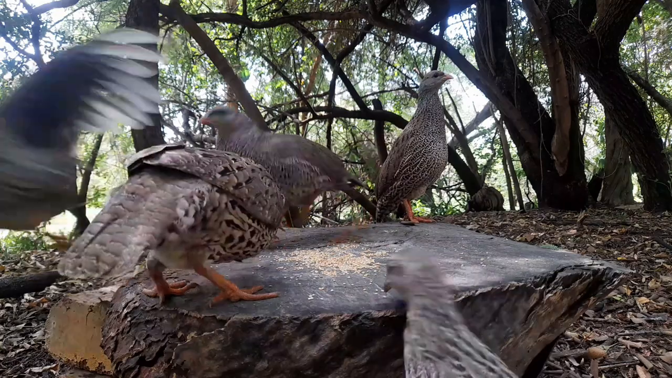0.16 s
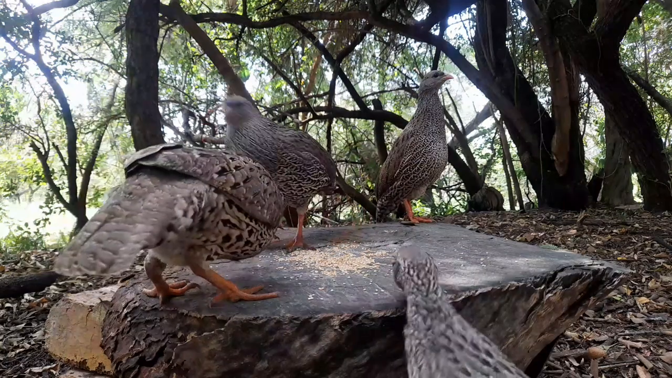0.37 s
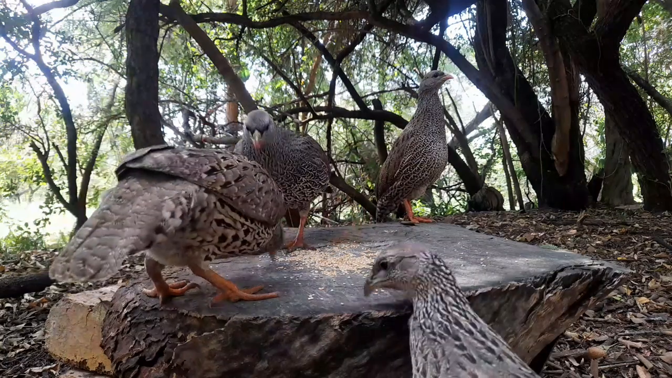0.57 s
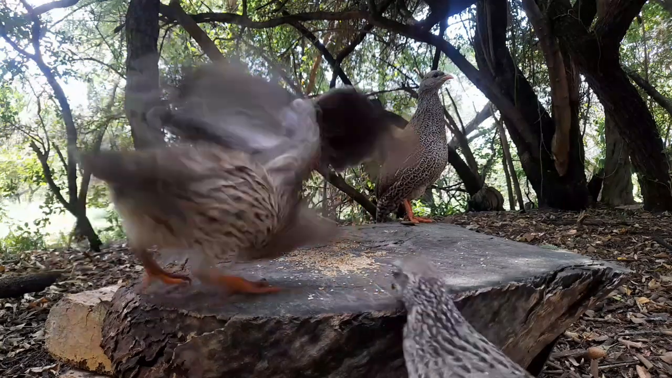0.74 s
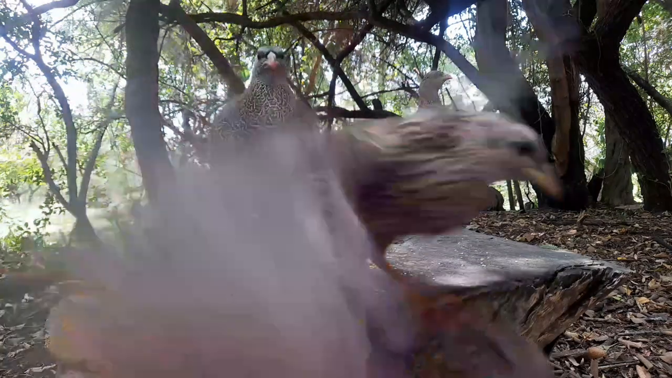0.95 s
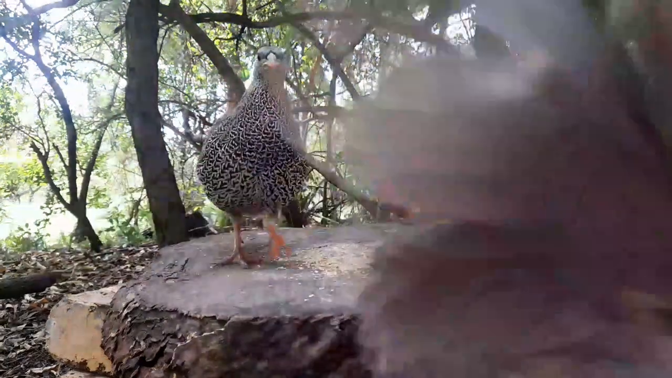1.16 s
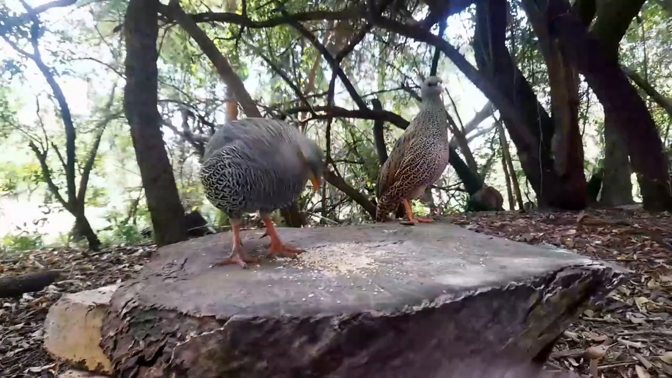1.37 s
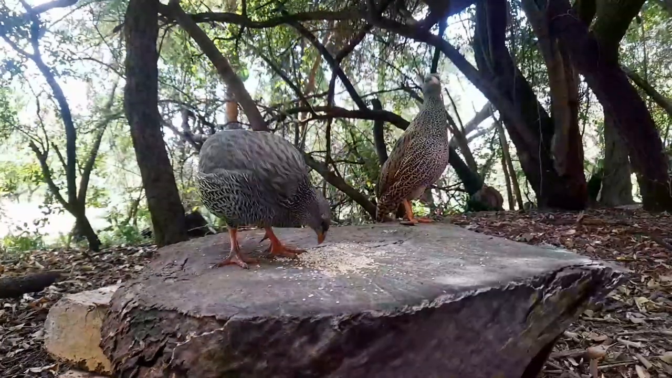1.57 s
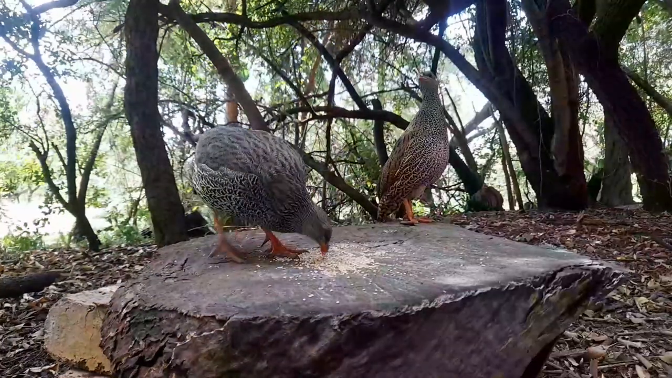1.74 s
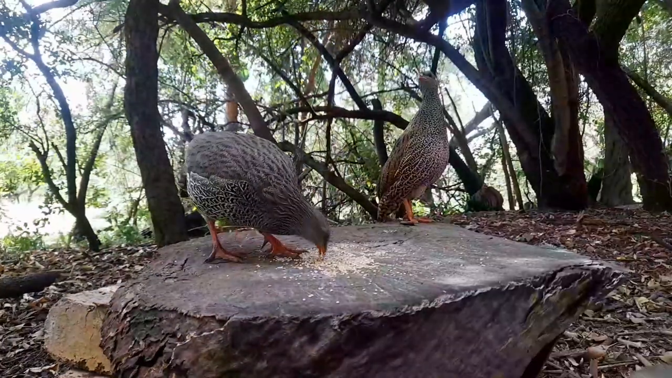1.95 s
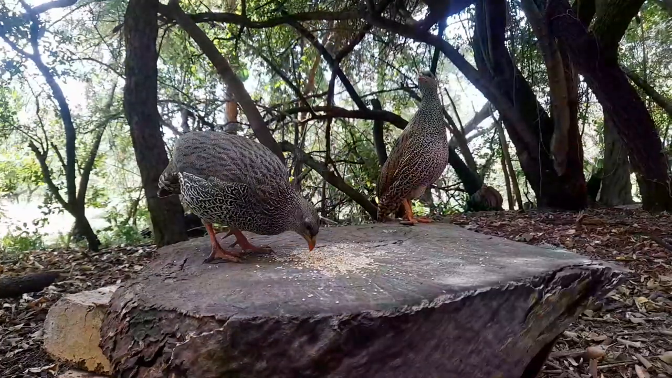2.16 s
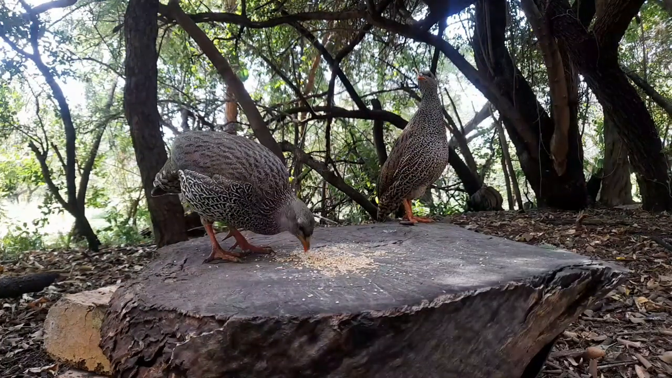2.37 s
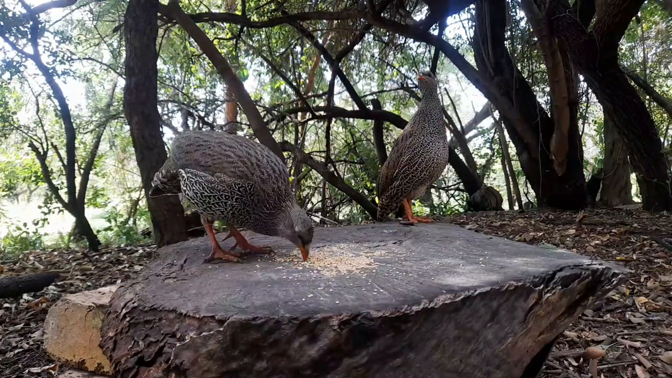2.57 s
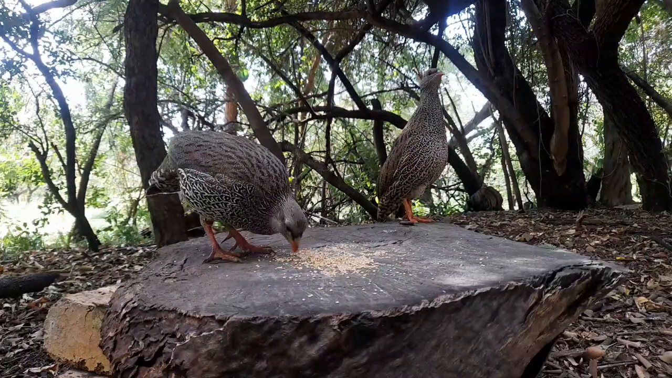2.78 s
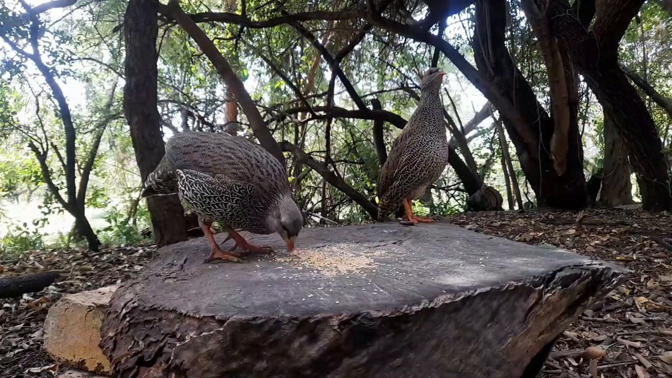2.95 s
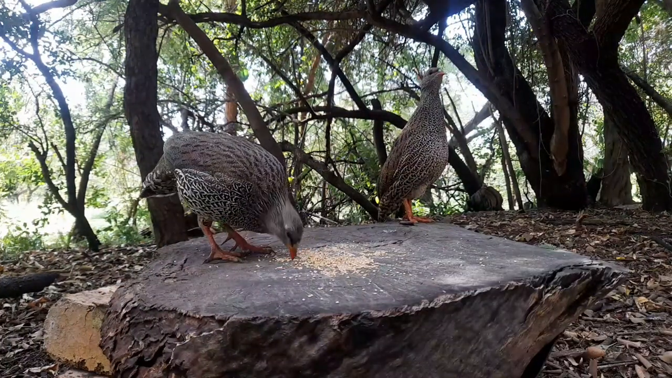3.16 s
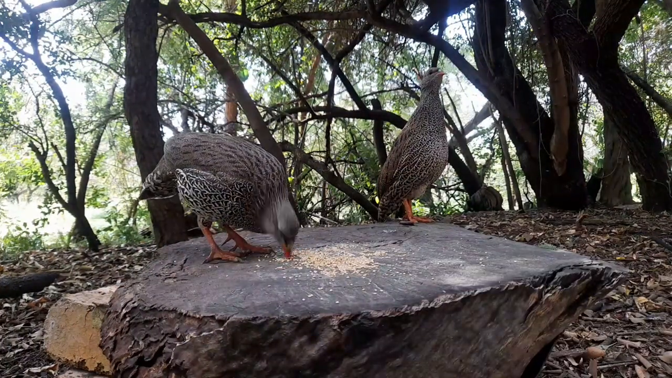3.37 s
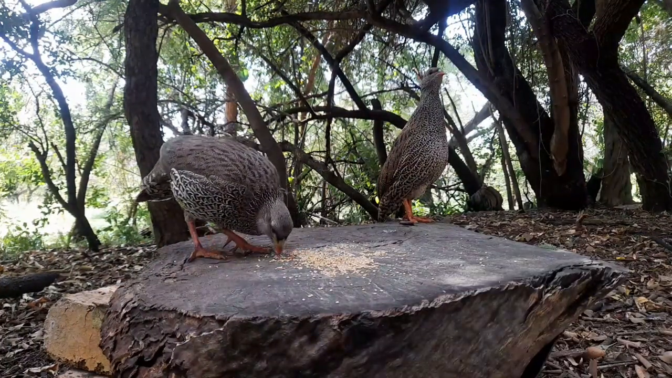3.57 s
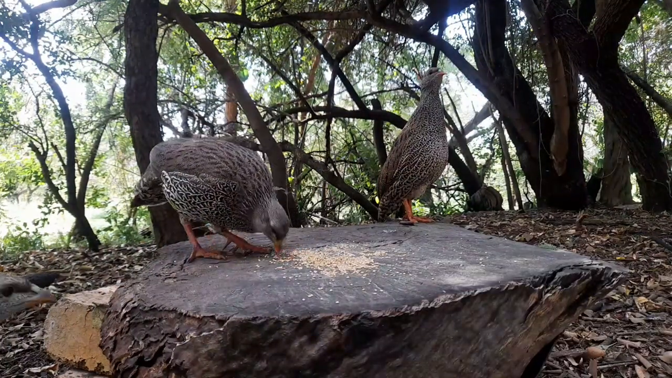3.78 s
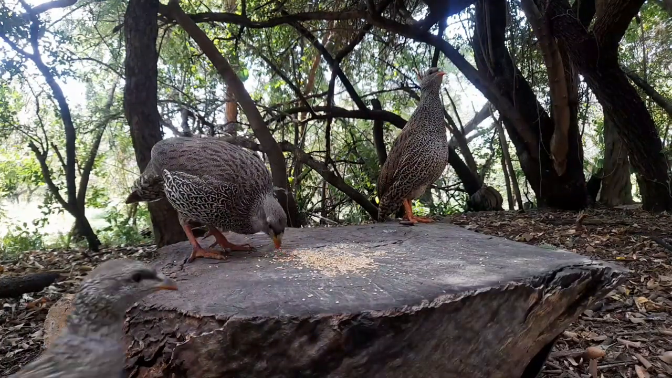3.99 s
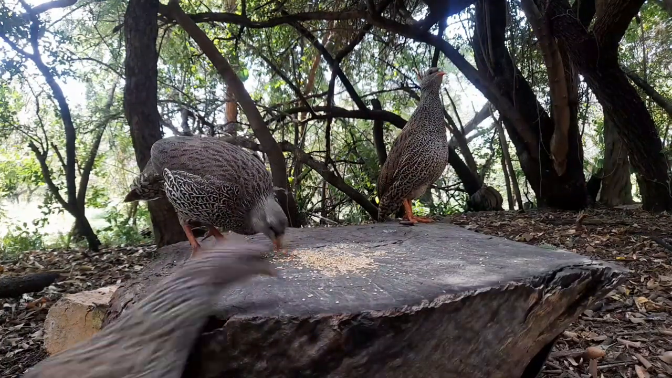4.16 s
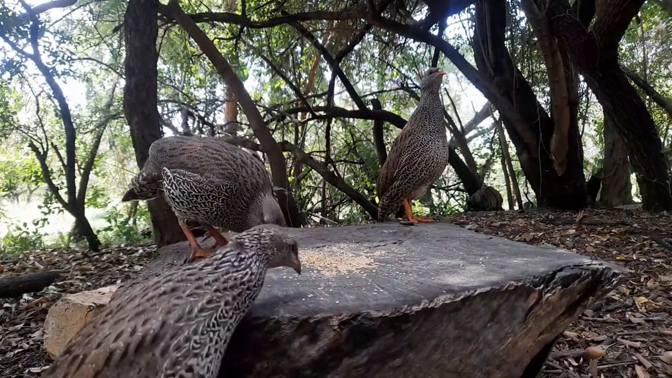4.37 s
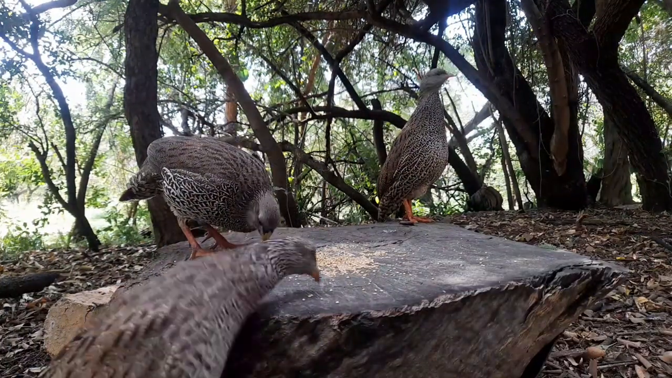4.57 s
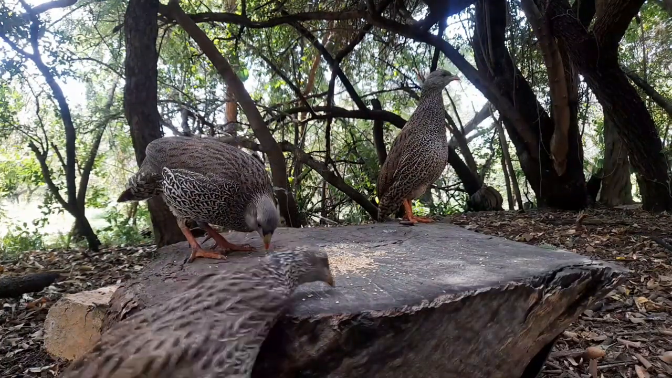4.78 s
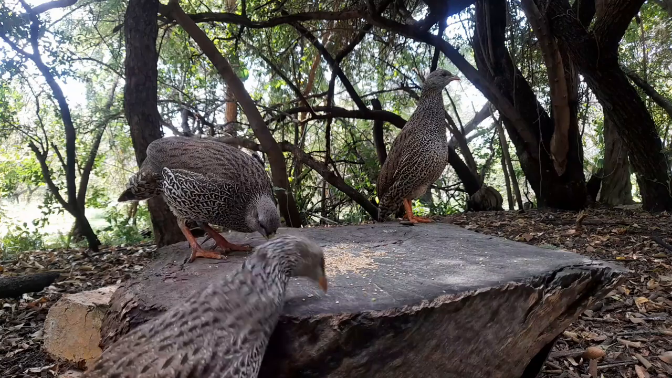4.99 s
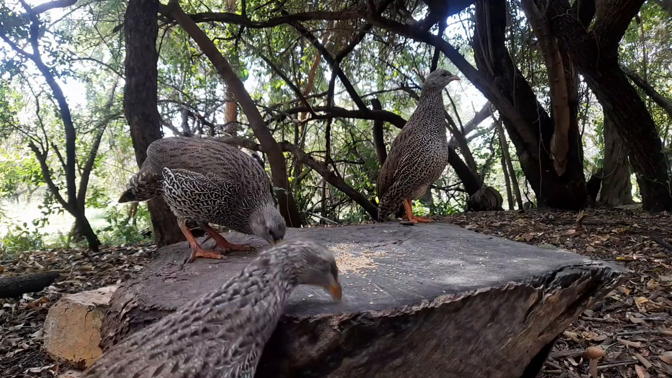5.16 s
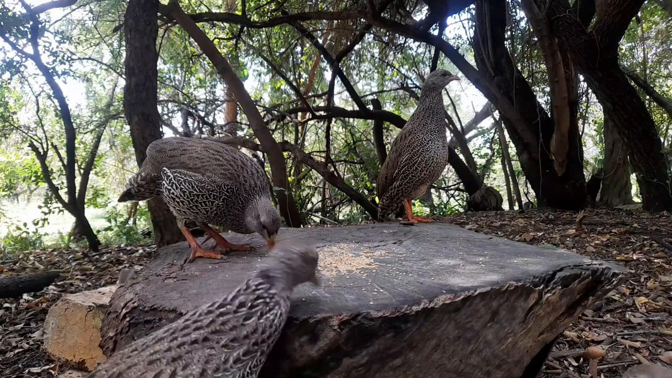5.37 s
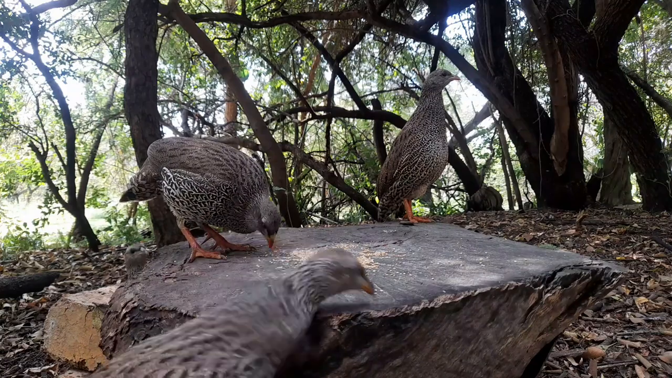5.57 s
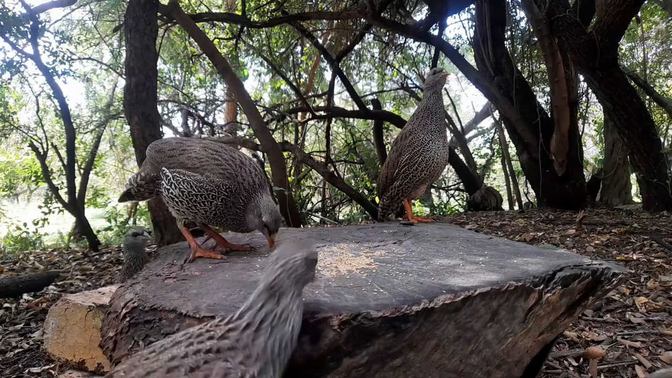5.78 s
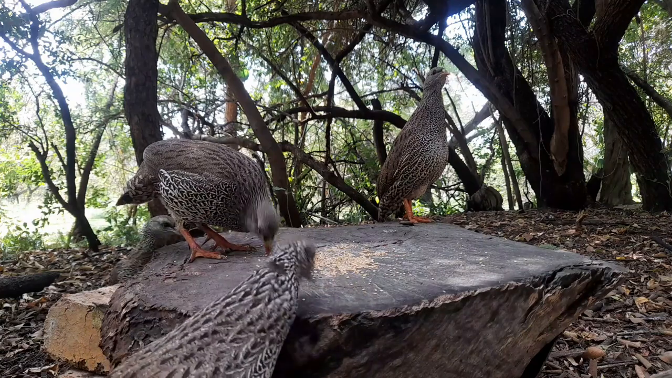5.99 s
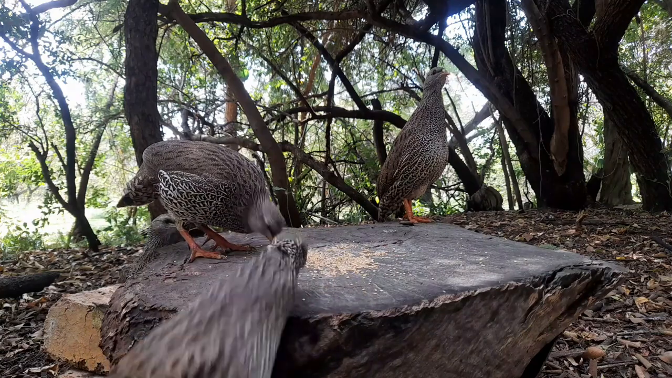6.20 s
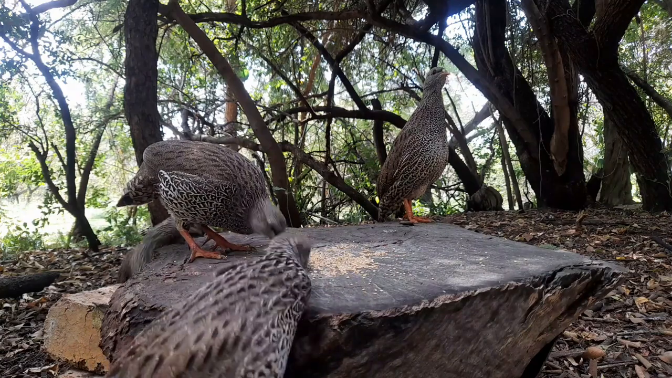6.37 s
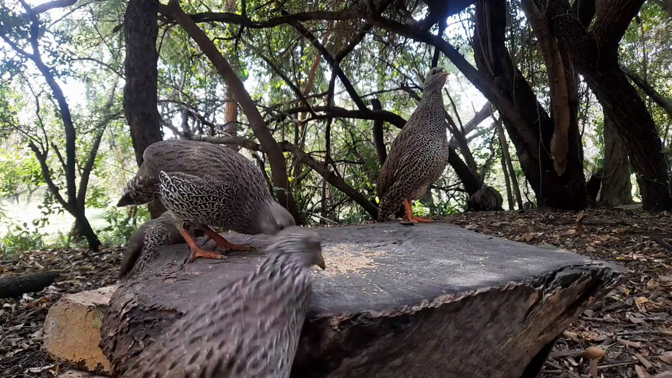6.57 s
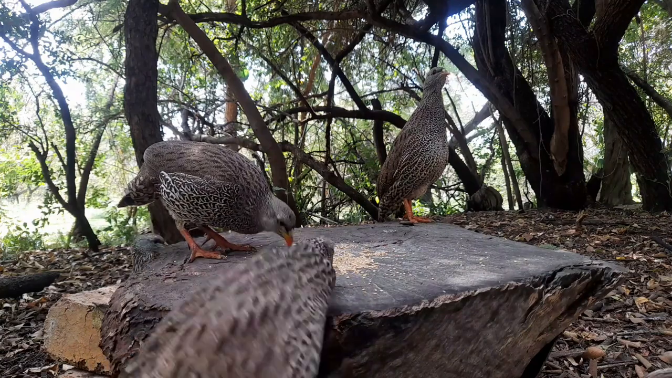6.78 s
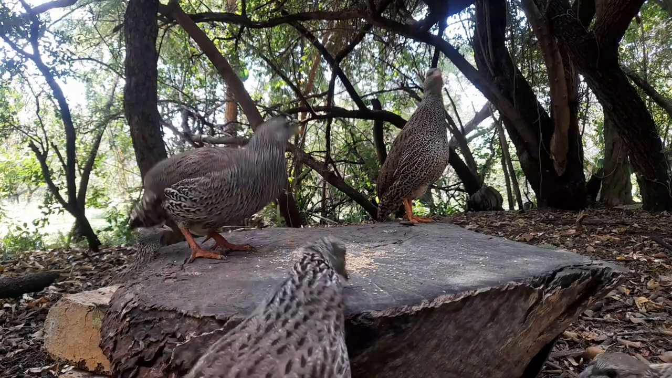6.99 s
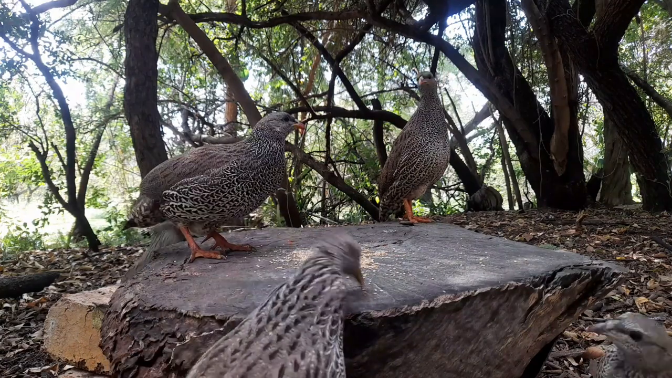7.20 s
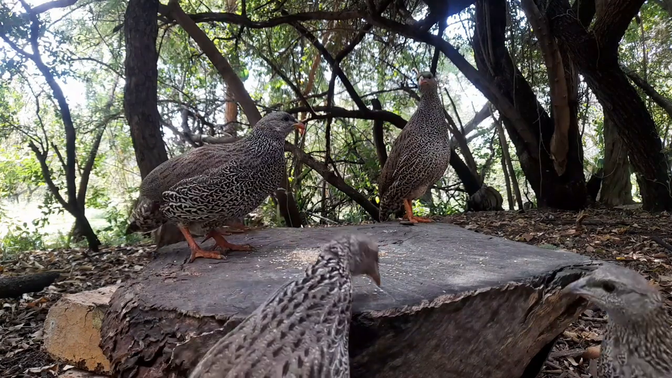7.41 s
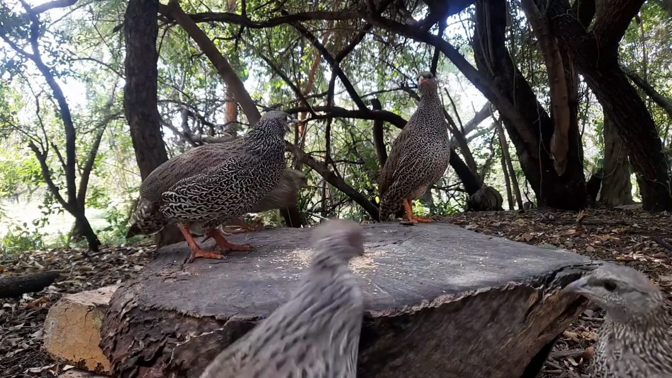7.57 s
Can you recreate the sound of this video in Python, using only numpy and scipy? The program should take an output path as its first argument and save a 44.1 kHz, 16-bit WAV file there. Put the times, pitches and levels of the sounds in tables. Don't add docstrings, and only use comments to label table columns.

```python
import sys
import numpy as np
from scipy import signal
from scipy.io import wavfile
from scipy.ndimage import uniform_filter1d

SR = 44100
rng = np.random.default_rng(int(sys.argv[2]) if len(sys.argv) > 2 else 0)


def unload_audio(sound):
    columns = np.transpose(np.atleast_2d(sound))
    steps = np.round(np.clip(columns, -1, 1) * 32767)
    wavfile.write(sys.argv[1], SR, steps.astype(np.int16))


def boost(x):
    u = np.asarray(x, float) / 20
    return 10 ** u


N = 336924

TOP_HZ = 15900
FLAP_S, FLAP_END_S = .72, 1.344

# frequency in Hz, level in dB.
TONE_COLOUR = [(500, 3), (2800, -1), (3600, -3.5), (5000, 1.5), (6500, 3), (8500, -10.5), (12000, -14.5)]
# time in seconds, level of the leaves in dB.
FLOOR = [(0, -67.5), (.7, -76), (1.6, -78), (2.0, -82), (2.27, -77.5), (2.5, -85), (2.9, -84), (3.25, -73),
         (3.5, -80.5), (4.0, -78.5), (4.6, -73.5), (4.95, -86.5), (5.4, -75), (6.6, -78), (7.35, -74),
         (7.64, -77)]


def rms_one(x):
    return x / np.sqrt(np.mean(x ** 2) + 1e-20)


def in_time(rows):
    s, *columns = np.transpose(rows)
    return [np.interp(np.arange(N) / SR, s, c) for c in columns]


def at_hz(points, hz):
    point_hz, value = np.transpose(points)
    return np.interp(np.log(hz), np.log(point_hz), value)


def row_at(table, s, usual):
    return next((row[1:] for row in table if abs(row[0] - s) < .004), usual)


def drift(rate, size=N):
    knots = rng.standard_normal(int(size * rate * 2 / SR) + 3)
    wander = np.interp(np.arange(size) * rate * 2 / SR, np.arange(len(knots)), knots)
    return uniform_filter1d(wander, 64) * 1.5


def band(x, low_hz, high_hz):
    return signal.sosfilt(signal.butter(2, [low_hz, high_hz], "band", fs=SR, output="sos"), x)


def banded(source, spectrum, low_hz, high_hz, patchy_db, rate):
    # frequency in Hz, likeness (1 = the same).
    likeness = [(50, 0.8), (1000, 0.14), (3000, 0.098), (12000, 0.3)]
    out = 0
    edges = low_hz * 2 ** np.arange(0, np.log2(high_hz / low_hz) + .1, .5)
    for k, (low, high) in enumerate(zip(edges, edges[1:])):
        centre_hz = np.sqrt(low * high)
        mid, side = band(source[k % 2], low, min(high, .45 * SR))
        alike = np.clip(at_hz(likeness, centre_hz), 0, 1)
        gain = boost(at_hz(spectrum, centre_hz) + patchy_db * drift(rate))
        out = out + gain * (np.sqrt(1 + alike) * mid + np.sqrt(1 - alike) * side * [[1], [-1]])
    return rms_one(out)


def sides(pan_db):
    return boost(np.array([pan_db / 2, -pan_db / 2]))


def placed(sound, pan_db, lead_us=3 / 44100 * 1e6):
    lead, i = lead_us * SR / 1e6, np.arange(len(sound))
    return sides(pan_db)[:, None] * [np.interp(i + lead / 2, i, sound), np.interp(i - lead / 2, i, sound)]


def add(out, s, sound):
    i = max(round(s * SR), 0)
    out[:, i:i + sound.shape[1]] += sound[:, :N - i]


def whistle(hz, db, octave_db, rough_db=.6, step_db=-13):
    turn = 2 * np.pi * np.cumsum(hz * (1 + 0.0036 * drift(270, len(hz)))) / SR
    tone = np.sin(turn)
    for k in (2, 3, 4, 5):
        overtone = boost(octave_db + step_db * (k - 2) + at_hz(TONE_COLOUR, k * hz)) * np.sin(k * turn)
        tone = tone + overtone * (k * hz < TOP_HZ)
    strain = 1 + np.abs(np.gradient(hz)) * boost(db + 22.0) / 3.5
    breath = 1 + boost(-24.5) * strain * uniform_filter1d(rng.standard_normal(len(hz)), size=16)
    ends = signal.windows.tukey(len(hz), min(1, 260 / len(hz)))
    return tone * breath * boost(db + rough_db * drift(150, len(hz))) * ends


def call(s, hz, db, pan_db, octave_db, lead_us=68, corner=130, step_db=-8.0, pressed=0.35):
    t = np.arange(s[0], s[-1], 1 / SR)
    level = np.interp(t, s, db)
    pitch = uniform_filter1d(np.interp(t, s, hz), size=corner, mode="nearest")
    effort_db = octave_db + pressed * (level - np.max(db))
    return placed(whistle(pitch, level, effort_db, rough_db=.7, step_db=step_db), pan_db, lead_us)


def knock(hz, cycles):
    t = np.arange(round(cycles / hz * SR)) / SR
    return np.sin(2 * np.pi * hz * t) * boost(-40 * t * hz / cycles) * np.minimum(t * hz * 3, 1)


def wood():
    # frequency in Hz, level in dB per Hz.
    colour = [(15, -50), (30, -18.5), (85, 2.5), (187, -12), (378, -18.5), (1320, -31.5), (2300, -34),
              (3510, -37), (6210, -21), (8140, -32), (14400, -13.5), (16500, -32.5)]
    # time in seconds, half-length in seconds, rise in dB.
    swells = [
        (2.5, 0.34, 10),
        (5.0, 0.078, 14.5),
    ]
    white = rng.standard_normal((2, 2, N))
    t = np.arange(N) / SR
    rumble_db = -72 + in_time(FLOOR)[0] + 78
    for s, half, db in swells:
        rumble_db += db * np.exp(-((t - s) / half) ** 2)
    rumble = boost(rumble_db + 3.5) * banded(white, colour, 22, 500, patchy_db=1.0, rate=4.5)
    hiss = boost(-82.5 + 3.5) * banded(white, colour, 230, 23000, patchy_db=1.8, rate=5.6)
    return rumble * sides(-2.4)[:, None] + hiss


def far_trill():
    # start in seconds, top pitch in Hz, level in dB.
    notes_far = [(0.048, 3000, -39), (0.15, 2790, -44), (0.221, 2740, -43.5), (0.356, 2517, -47.5),
                 (0.44, 2460, -56.5), (3.32, 2457, -54), (3.422, 2650, -50), (3.522, 2643, -49.5),
                 (3.619, 2544, -52.5), (3.717, 2630, -58), (3.815, 2426, -54.5), (3.905, 2130, -67.5)]
    out, arch = np.zeros((2, N)), np.linspace(-1, 1, round(.056 * SR))
    bend = 0.24 * np.abs(arch) ** 2.5
    for s, top_hz, db in notes_far:
        note = whistle(top_hz * (1 - bend), db - 7 * arch ** 2, -44, rough_db=1.5)
        slap_hz = top_hz * rng.uniform(.97, 1.05) * (1 - 0.39 * bend)
        slap = whistle(slap_hz, db - 15.5 - 5 * arch ** 2, -44, rough_db=2.5)
        add(out, s, placed(note, -4, -110))
        add(out, s + .047, placed(slap, 1, 40))
    return out


def rustle():
    # frequency in Hz, level in dB per Hz.
    leaf_colour = [(300, -4), (1200, -9.5), (2500, -11), (6500, -9), (8500, -20.5), (13500, -8.5),
                   (16000, -11.5)]
    # start in seconds, length in ms, level in dB.
    steps = [(.105, 42, -61), (.404, 47, -48.5), (.612, 61, -57.5), (1.075, 39, -51.5), (1.307, 32, -46.5),
             (1.433, 18, -55.5), (2.143, 30, -60.5), (3.193, 50, -60.5), (3.57, 17, -69), (4.285, 21, -56),
             (6.09, 51, -65), (6.502, 13.4, -64), (6.876, 128, -61), (7.2, 30, -63), (7.425, 6.4, -55)]
    # start in seconds, length in ms, level in dB.
    swishes = [(.732, 110, -60), (.77, 51, -38.5), (.88, 24, -55), (1.41, 20, -58), (1.533, 42, -55.5),
               (2.254, 34, -67), (2.3, 8.3, -58), (4.045, 8, -59.5), (4.068, 29, -59.5), (4.177, 9, -46),
               (4.44, 105, -65.5), (4.559, 27, -62), (4.664, 33, -71), (7.28, 120, -63)]
    # start in seconds, length in ms, level in dB.
    slaps = [
        (.763, 55, -45),
        (.864, 7.2, -38),
        (1.152, 20, -53),
        (1.224, 27, -52),
        (1.251, 38, -52.5),
    ]
    crackle = (rng.random(N) < 900 / SR) * boost(3.2 * np.minimum(rng.exponential(1, N), 3))
    source = rng.standard_normal((2, 2, N)) * (1.3 + uniform_filter1d(crackle, size=30) * 7)
    leaves = banded(source, leaf_colour, 205, 18000, patchy_db=1.5, rate=19)
    lower = signal.sosfilt(signal.butter(4, 6500, fs=SR, output="sos"), leaves)
    settled = FLAP_END_S + 0.25
    flurry, = in_time([(FLAP_S, 0), (FLAP_S + 0.046, 1), (FLAP_END_S, 1.2), (FLAP_END_S + 0.0075, .4),
                       (settled, .2), (settled + 0.063, 0)])
    bright = boost(in_time(FLOOR)[0]) + boost(-60 + 1.5 * drift(25) + 2.6 * drift(120)) * flurry
    dull = bright * (1 + 0.3 * flurry)
    for rows, body_db in ((steps, -5), (swishes, -17.5), (slaps, 10.5)):
        for s, ms, db in rows:
            i, t = round(s * SR), np.arange(round(ms * SR / 1000)) / SR * 1000 / ms
            fade_db = -12.0 * t - 13.0 * np.maximum(t - .7, 0)
            shape = boost(db + fade_db + 2.2 * drift(150, len(t))) * np.minimum(t * ms / 3.5, 1)
            bright[i:i + len(t)] += shape
            dull[i:i + len(t)] += shape * boost(body_db)
    return boost(7.0) * (bright * (leaves - lower) + dull * lower)


def ticks():
    # start in seconds, peak level in dB.
    snaps = [(.735, -40), (0.901, -35.5), (0.963, -48), (1.272, -19), (2.8586, -42.5), (3.171, -43),
             (3.199, -59.5), (5.453, -45), (5.8226, -41), (7.2048, -31), (2.074, -54), (2.205, -54),
             (5.69, -53), (7.2011, -41), (7.2175, -52), (7.2296, -52.5), (7.301, -45.5), (7.38, -52),
             (7.4303, -52), (7.511, -50), (7.618, -63)]
    out, t = np.zeros((2, N)), np.arange(round(.012 * SR)) / SR
    for (s, db), pan in zip(snaps, rng.normal(0, 5.6, (len(snaps), 1))):
        snap = rng.standard_normal(len(t)) * (boost(-60 * t / 0.0016) + boost(-11.5 - 60 * t / 0.023))
        snap = snap / np.abs(snap).max()
        click = band(snap, 5200, 22000) + boost(-23.0) * band(snap, 1200, 7400)
        add(out, s, placed(boost(db + 8.5) * click, pan[0]))
    return out


def taps():
    # start in seconds, peak level in dB, ring pitch in Hz.
    blows = [(0.417, -45.5, 171), (0.775, -29, 232), (0.865, -34, 1370), (0.998, -31, 880),
             (1.115, -38.5, 576), (1.228, -34, 325), (1.256, -39, 151.6), (2.055, -50.5, 414),
             (3.178, -50.5, 293), (5.799, -51, 304.4), (6.929, -56.5, 258.4), (7.205, -51, 296),
             (7.233, -51.5, 317), (7.453, -59, 420), (7.489, -57, 380), (7.565, -58.5, 402)]
    out, t = np.zeros((2, N)), np.arange(round(.008 * SR)) / SR
    for s, db, hz in blows:
        crack = band(rng.standard_normal(len(t)), 500, 2200)
        add(out, s, placed(boost(db + 2) * knock(hz, cycles=7.0), -2.5))
        add(out, s, placed(boost(db + 2.5 - 60 * t / 0.009) * crack, -2.5))
    return out


def flutter():
    # start in seconds, peak level in dB.
    claps = [(.762, -37.5), (.773, -21), (.779, -24.5), (.865, -9), (.869, -16), (.873, -22), (0.964, -44),
             (0.975, -52), (.999, -54), (1.012, -47), (1.032, -35), (1.05, -36), (1.063, -33), (1.119, -34),
             (1.134, -37), (1.15, -32), (1.158, -45), (.869, -24.5), (1.229, -31), (1.233, -30),
             (1.256, -31), (1.261, -32), (1.307, -43), (1.437, -39.5), (1.507, -53.5), (1.55, -49),
             (2.0545, -48), (2.145, -50), (3.196, -50), (7.204, -58)]
    out, t = np.zeros((2, N)), np.arange(round(0.03 * SR)) / SR
    for s, db in claps:
        snap = rng.standard_normal(len(t)) + 0.2 * rng.standard_normal((2, len(t)))
        add(out, s, boost(db + 1.0) * band(snap * boost(-60 * t / .012), 500, 3600))
    return out


def wings():
    # time in seconds, pitch of the push in Hz, level in dB.
    beats = [
        (0.782, 90.5, -21),
        (0.86, 71, -25.5),
        (0.948, 62, -28.5),
        (1.054, 89, -29.5),
        (1.149, 69.4, -36),
        (1.278, 72.4, -23),
    ]
    t = np.arange(N) / SR
    turns = [FLAP_S, FLAP_S + 0.02, FLAP_END_S, FLAP_END_S + 0.019]
    gate = np.interp(t, turns, [0, 1, 1, 0]) ** 2
    air = rng.standard_normal((2, 1, N)) + 1.2 * rng.standard_normal((2, 2, N))
    tiring_db = np.interp(t, turns[1:3], [0, -7.5])
    low = rms_one(band(band(air[0], 35, 120), 30, 200)) * boost(-44.5 + tiring_db + 1.5 * drift(27))
    upper = rms_one(band(air[1], 140, 760)) * boost(-56 + 3.9 * drift(40))
    out = gate * (low + upper)
    for s, hz, db in beats:
        push = np.array([knock(hz, cycles=4.5), knock(hz * 1.18, cycles=4.5 * 1.18)])
        add(out, s - .012, boost(db) * push * sides(-9.5 * (s - .6))[:, None])
    return out


def free_calls():
    # time in seconds, pitch in Hz, level in dB.
    squeals = [
        [(.697, 4450, -49), (.73, 4780, -36), (.737, 5900, -23), (.75, 5050, -35), (.76, 5190, -17),
         (.769, 4900, -19)],
        [(.782, 3590, -10), (.787, 2930, -21), (.794, 2666, -11), (.811, 2166, -9.5), (.819, 1880, -27.5),
         (.825, 1580, -33)],
        [(.8645, 1240, -8.5), (.874, 2594, -21.5), (.877, 4410, -15), (.884, 5400, -22.5), (.893, 5420, -22),
         (.9, 4870, -25.5), (.922, 4696, -21.5), (.929, 4140, -27), (.939, 870, -32)],
        [(1.0, 1010, -40), (1.011, 2770, -45), (1.022, 3100, -50), (1.045, 3050, -49), (1.068, 1990, -35.5),
         (1.09, 1720, -46), (1.1, 1940, -37)],
        [(1.052, 3330, -80), (1.062, 4650, -36.5), (1.1, 3560, -35), (1.12, 1378, -71)],
        [(1.155, 1440, -77), (1.166, 4580, -42.5), (1.2, 6510, -35.5), (1.22, 6400, -38), (1.24, 5740, -31),
         (1.27, 5570, -40.5), (1.29, 4590, -29), (1.308, 2710, -46.5), (1.325, 2060, -37.5)],
    ]
    # left-right difference in dB, octave level in dB, left leads by microseconds.
    squeal_voices = [(1, -22, 80), (0, 1.5, 72), (-1.5, -13, 0), (-8.5, -35, -136), (-8, -25, -136),
                     (-16.5, -30, -100)]
    # time in seconds, pitch in Hz, level in dB.
    cries = [
        [(.773, 5770, -29.5), (.78, 4800, -20), (.787, 4100, -24.5)],
        [(4.458, 5880, -63), (4.468, 5300, -47), (4.478, 4600, -49)],
        [(.025, 748, -39.5), (.05, 2930, -50), (.07, 1880, -30), (.09, 1050, -38.5), (.103, 613, -36)],
        [(.497, 1775, -44.5), (.515, 2190, -61.5), (.532, 1470, -47.5), (.547, 1490, -63), (.57, 749, -45.5),
         (.592, 685, -44.5)],
        [(6.9, 3660, -47), (6.915, 4160, -35), (6.94, 3645, -34), (6.97, 3150, -46)],
    ]
    # left-right difference in dB, octave level in dB, left leads by microseconds.
    cry_voices = [(1, -30, 40), (-1, -29, 58), (2, -17, 88), (-0.5, -9.5, 87), (3, -27.5, -50)]
    # start in seconds, top pitch in Hz, dip pitch in Hz, level in dB.
    clucks = [
        (.17, 1360, 802, -37),
        (4.204, 1266, 683, -42.5),
        (4.421, 1210, 812, -39.5),
    ]
    cluck_s = (0, .021, .042, .059)
    swell_db = (-13, -10.5, 0.5, -8)
    # start in seconds, length in seconds, from pitch in Hz, to pitch in Hz, level in dB.
    slides = [
        (0, .06, 2930, 2890, -46),
        (0, .022, 1570, 1150, -45.5),
        (.648, .072, 3780, 3640, -53.5),
        (1.308, .024, 5200, 3700, -38),
        (4.5, .012, 1300, 3400, -47.5),
        (5.336, .019, 446, 2090, -61.5),
        (5.855, .06, 2050, 1950, -70),
        (5.86, .05, 1300, 1150, -70),
        (7.377, .055, 2050, 1400, -52),
        (7.543, .035, 2180, 1540, -52),
    ]
    out = np.zeros((2, N))
    for rows, voice in zip([*squeals, *cries], [*squeal_voices, *cry_voices]):
        add(out, rows[0][0], call(*np.transpose(rows), *voice))
    for s, top_hz, dip_hz, db in clucks:
        hz = np.array([0.42 * top_hz, top_hz, dip_hz, 1.124 * dip_hz])
        cluck = call(cluck_s, hz, db + np.array(swell_db), 0.95, -4, corner=600, step_db=-8.5, pressed=1.1)
        second_db = db + np.array([*swell_db[:2], -22.0])
        second = call(cluck_s[:3], 1.35 * hz[:3], second_db, 1, -30, corner=600)
        second = second[:, np.minimum(np.arange(cluck.shape[1]), 1800)]
        cluck = cluck + boost(-4.5) * second
        add(out, s, cluck * boost(1.3 * drift(300, cluck.shape[1])))
    way = np.linspace(0, 1, num=7)
    for s, length, from_hz, to_hz, db in slides:
        hz = to_hz + (from_hz - to_hz) * (1 - way) ** 0.94
        add(out, s, call(length * way, hz, db - 9.5 * way ** 2, -1.6, -14))
    return out


def peeps():
    # time of the dip in seconds, then start, dip and top-of-flick pitch in Hz,
    # and peak level in dB.
    left = [(0.38, 2054, 1767, 2560, -43), (1.89, 2580, 2035, 4105, -58.5), (4.49, 3290, 1870, 3000, -44.5),
            (5.705, 3324, 2100, 6620, -64), (6.264, 2216, 1970, 4490, -56.5),
            (1.739, 2520, 1990, 2290, -61), (4.368, 3200, 2200, 3430, -66), (6.605, 3110, 2500, 6350, -66)]
    ahead = [(0.73, 3700, 2530, 4650, -38), (1.871, 3200, 2635, 6250, -46),
             (2.266, 3000, 2420, 5430, -49.5), (3.25, 3480, 2780, 5780, -43),
             (3.301, 3300, 1976, 6680, -40.5), (4.021, 2500, 1690, 4360, -41.5),
             (4.154, 3500, 2636, 5860, -45.5), (4.792, 3100, 1937, 3940, -55),
             (5.379, 2200, 1534, 4320, -40), (5.516, 3600, 1870, 6920, -49),
             (6.269, 3400, 2440, 6030, -34.5), (6.392, 3200, 2300, 6320, -59.5),
             (6.685, 3000, 2286, 5630, -30), (6.972, 3200, 1687, 2830, -39.5),
             (7.185, 2300, 1813, 3850, -51.5)]
    right = [(0.268, 4020, 1983, 5250, -37.5), (0.629, 3620, 2228, 4070, -36),
             (1.559, 2370, 1920, 4370, -47.5), (1.743, 3790, 2290, 6210, -58),
             (2.074, 4100, 2162, 6440, -61.5), (2.177, 2404, 1850, 5050, -39),
             (2.51, 3734, 2193, 6580, -50.5), (2.834, 2507, 2034, 4190, -67.5),
             (3.069, 3090, 1794, 4710, -61.5), (3.746, 3360, 2607, 6460, -40.5),
             (3.755, 2799, 2170, 3640, -42.5), (4.553, 3425, 2420, 5560, -24),
             (4.766, 2420, 1900, 2590, -57), (5.017, 2328, 1756, 4400, -39.5),
             (5.026, 3320, 1824, 5630, -46), (5.268, 3590, 2602, 6600, -31),
             (5.773, 2235, 1880, 4030, -52.5), (5.98, 3200, 1891, 5590, -48),
             (7.058, 3370, 2430, 5496, -60), (7.333, 3264, 2395, 5350, -28), (7.357, 2390, 1720, 3600, -43),
             (7.524, 2440, 1890, 4830, -47.5), (7.583, 3230, 2417, 5680, -41)]
    place_db = (4, -.4, -5)
    # time of the dip in seconds, fall in ms, full from ms before the dip,
    # until ms after it, sag meanwhile in dB.
    holds = [(.268, 58, 17, 12.5, 4), (.382, 33, 12.5, 14.4, 2), (.63, 40, 8, 5.4, 5),
             (1.559, 43, 12.4, 24, -6.5), (2.074, 54, 22, 10, -6.5), (2.177, 35, 6.5, 11.6, -8),
             (2.266, 35.3, 7.5, 8, -0.5), (3.069, 60.6, 20, 15.8, -2.5), (3.746, 37, 12.6, 12.2, -3.5),
             (4.02, 42.6, 22.4, 11.7, 2), (4.153, 48, 23, 30, -4.5), (4.553, 43, 4.2, 11.3, -7),
             (5.016, 37, 10, 9.7, -2), (5.27, 26.4, 4.3, 9.5, -6.5), (5.381, 26, 8.2, 7.8, 4.5),
             (5.516, 56, 7.7, 11, -7), (5.705, 52, 12, 11, -3), (5.979, 43, 10, 9, -4),
             (6.27, 35, 2.8, 9, -6.5), (6.391, 41, 33, 10, -6), (6.686, 38.7, 5.6, 9.6, -2),
             (7.333, 30.7, 3.1, 7.3, -11)]
    # time of the dip in seconds, extra octave level in dB,
    # extra flick level in dB, extra left-right difference in dB, left leads by microseconds.
    colours = [(.268, -8, -8, -0.5, 5.5), (.382, -4, 0, 1, 73), (.63, -3, 6, 4, 74),
               (1.559, 4, 2.5, -1, 93), (1.743, -11, 1.5, -3.5, 55), (1.871, 3, -5.5, 4, 51),
               (1.889, -9.5, -1.5, 2, 85), (2.177, -10.5, -9.5, 1.5, 45), (2.266, 8, -2.5, 3, 41),
               (2.835, -9, -11.5, 0.5, 71), (3.069, 2, 10, 1, 54), (4.02, -7.5, -0.5, 0.5, 18),
               (4.153, 3.5, 2.5, 1, 58), (4.368, -13, -10, -0.5, 73), (4.553, 9, 1, 1, 75),
               (4.766, -10, 0, 2.5, 62), (4.792, -12, -3.5, -0.5, 75), (5.27, -12, 0.5, 1.5, 76),
               (5.381, -5, 0, -0.5, 105), (5.516, 6, 2.5, -3, 43), (5.705, -1, 0.5, -1.5, 57),
               (6.262, 4, 4, -1, 51), (6.27, 1, 1, 2.5, 84), (6.391, -14, -6, -1.5, 88),
               (6.605, -0.5, -2, -2, 60), (6.686, -3.5, 1, -1.5, 68), (7.057, -8, -7, -2, 83),
               (7.185, -6, -5, -3, 72), (7.333, -4, 1, -0.5, 49), (7.582, -2.5, 1.5, 3.5, 65)]
    out = np.zeros((2, N))
    for table, pan_db in zip((left, ahead, right), place_db):
        for s, start_hz, dip_hz, top_hz, db in table:
            drop_hz = start_hz - dip_hz
            fall = .036 + 0.0026 * drop_hz / 1000 - .002 * (db + 43) / 10
            fall_ms, full_ms, until_ms, sag_db = row_at(holds, s, (1000 * fall, 4, 11, -6.5))
            fall, full, until = fall_ms / 1000, min(full_ms, fall_ms - 5) / 1000, until_ms / 1000
            more_octave_db, more_flick_db, more_pan_db, lead_us = row_at(colours, s, (0, 0, 0, 68))

            arches = top_hz > 4150 and (top_hz < 5150 or drop_hz < 620 or more_flick_db > 1)
            top = .027 + .007 * arches
            t = np.arange(-fall, top + (0.0033 + arches * (.011 if top_hz < 5600 else .004)), 1 / SR)
            down = drop_hz * np.sin(np.pi / 2 * np.abs(np.minimum(t, 0) / fall) ** 1.1) ** 1.8
            up = np.sin(np.pi / 2 * np.clip(t / top, 0, 1) ** 1.6) ** 2
            over = 1 - .8 * (np.maximum(t - top, 0) / .018) ** 2
            hook = 1 - 0.11 * np.exp(-(t + fall) / 0.0035)
            hz = (dip_hz + down + (top_hz - dip_hz) * up * over) * hook

            flick_db = -44 + 0.54 * (db + 21.5) + 7 * arches + more_flick_db
            level = np.interp(
                t, [-fall, -full - 0.51 * (fall - full), -full, until, until + 0.006, top, top + 0.024],
                [db - 22.5, db - 11, db - 0.5, db + 1.5 + sag_db, flick_db - 2.5,
                 flick_db - 6.6 * (not arches), flick_db - 12.0])
            early_db = 9 * np.clip(-t / fall, 0, 1) - 0.4 * np.clip(db - level, 0, 30)
            octave_db = -16 - .5 * (db + 44.5) + early_db + more_octave_db
            rough_db = .6 + np.clip(-(db + 42) / 7, 0, 2.6)
            level += (t > until) * at_hz(TONE_COLOUR, hz)
            tone = whistle(hz, level, octave_db, rough_db)
            add(out, s - fall, placed(tone, pan_db + more_pan_db, lead_us))
    return out


def trees(x, t60):
    t = np.arange(round(.5 * SR)) / SR
    tail = band(rng.standard_normal((2, len(t))), 1000, 16000) * boost(-60 * t / t60) * np.minimum(t / 0.0033, 1)
    tail = tail / np.sqrt(np.sum(tail ** 2, 1, keepdims=True))
    return signal.fftconvolve(x.mean(0)[None], tail, axes=1)[:, :N]


def scene():
    near, far = peeps() + free_calls(), far_trill()
    echo = boost(-12) * trees(near, 0.058)
    echo = echo + boost(-27) * trees(near, .4)
    echo = echo + boost(-5.5) * trees(far, 0.27)
    return near + far + echo + rustle() + ticks() + taps() + flutter() + wings() + wood()


def low_pass(x):
    return signal.sosfilt(signal.butter(12, 16670, fs=SR, output="sos"), x)


def record(dry):
    rounded = 1.1 * np.tanh(dry / 1.1)
    top_cut = signal.cheby2(14, 60, TOP_HZ + 650, fs=SR, output="sos")
    return low_pass(signal.sosfilt(top_cut, rounded))


dry = scene()
out = record(dry)
unload_audio(out)
```